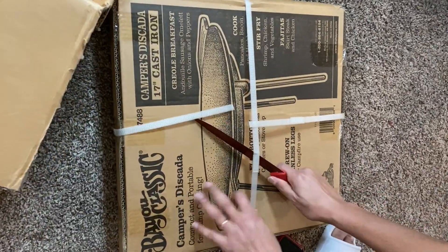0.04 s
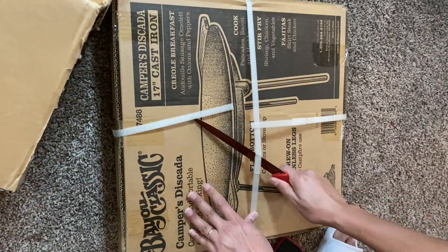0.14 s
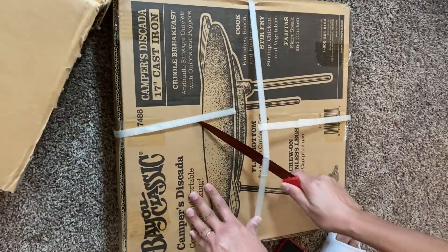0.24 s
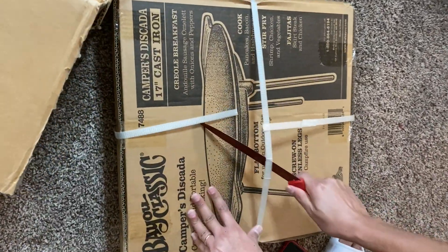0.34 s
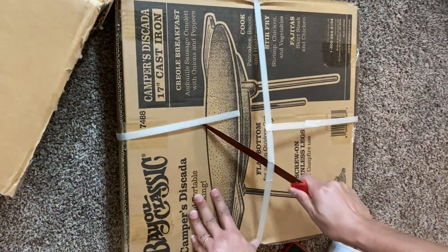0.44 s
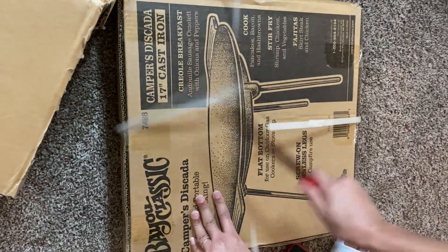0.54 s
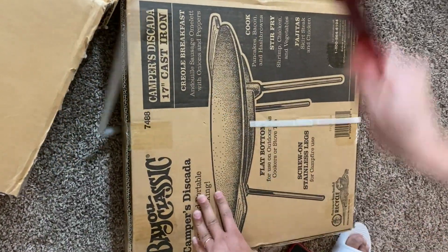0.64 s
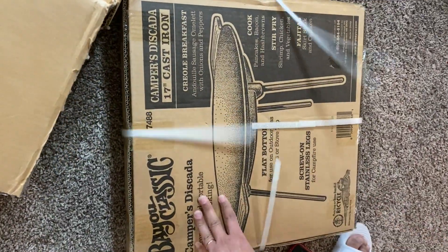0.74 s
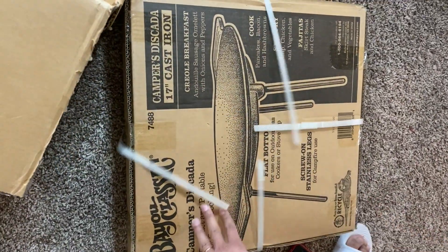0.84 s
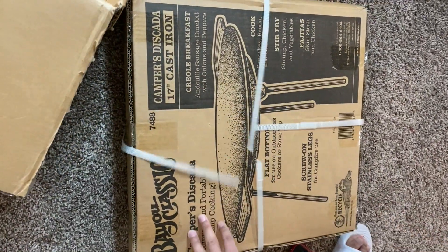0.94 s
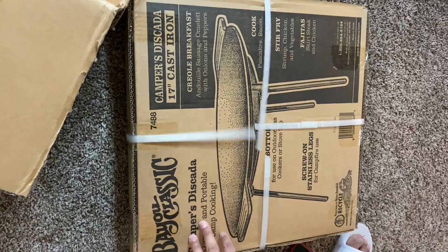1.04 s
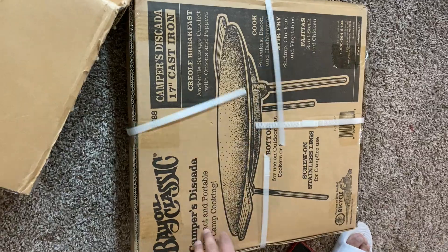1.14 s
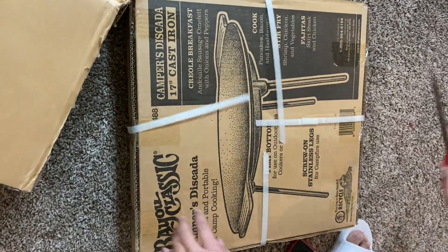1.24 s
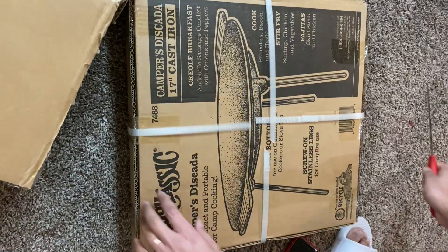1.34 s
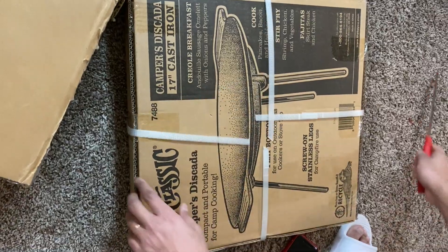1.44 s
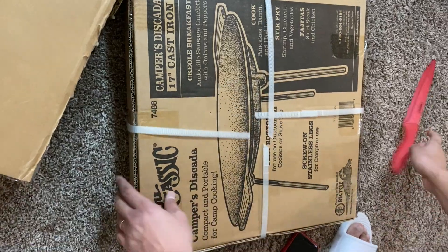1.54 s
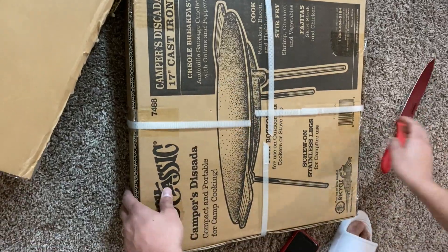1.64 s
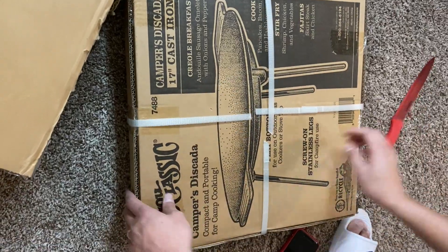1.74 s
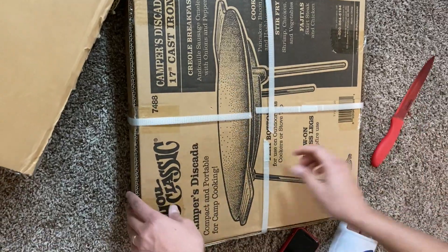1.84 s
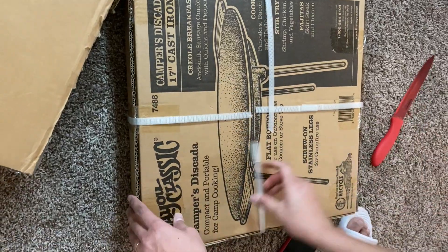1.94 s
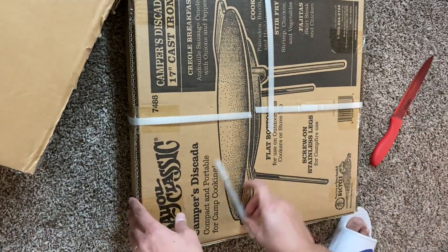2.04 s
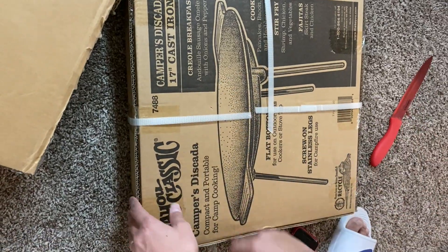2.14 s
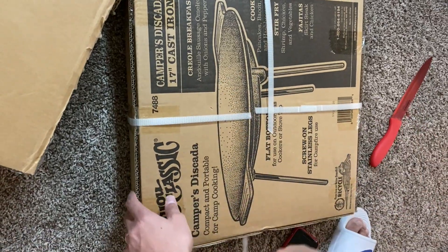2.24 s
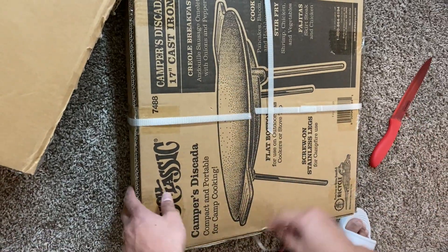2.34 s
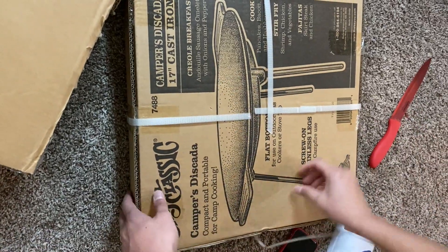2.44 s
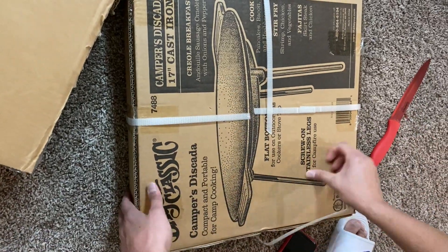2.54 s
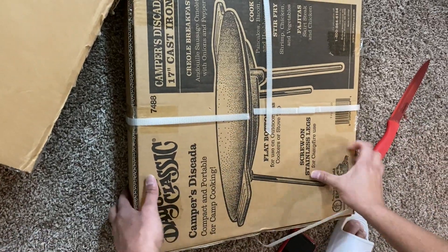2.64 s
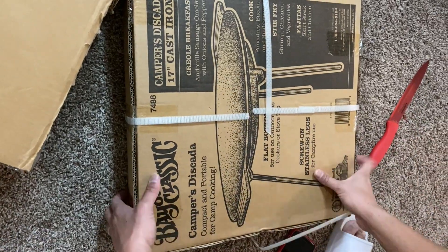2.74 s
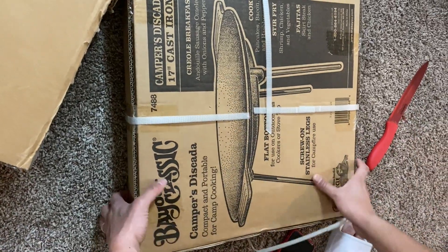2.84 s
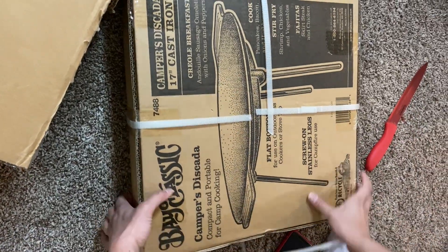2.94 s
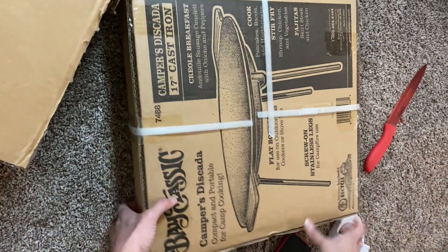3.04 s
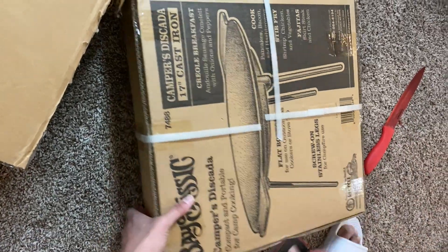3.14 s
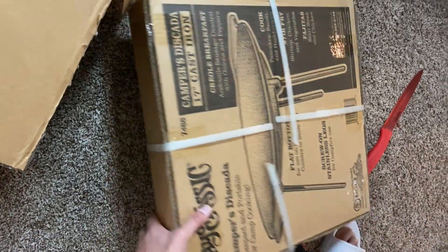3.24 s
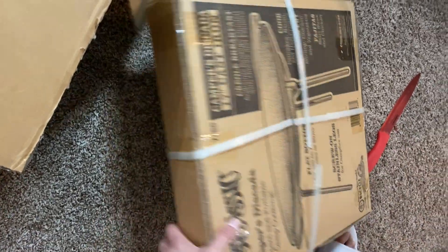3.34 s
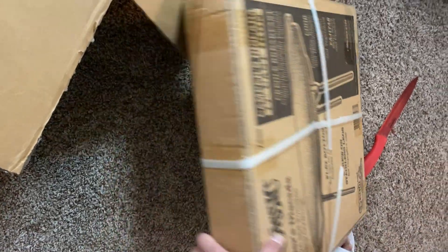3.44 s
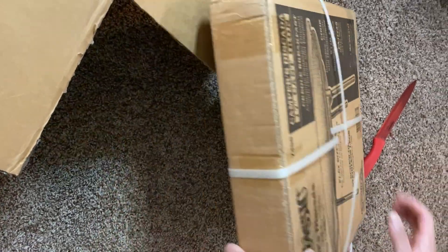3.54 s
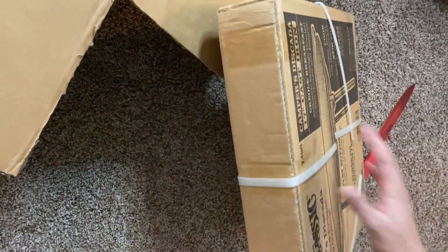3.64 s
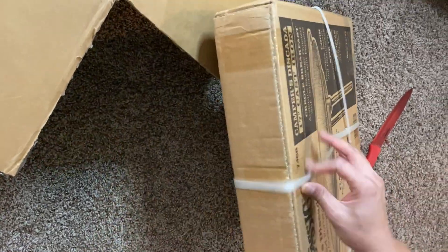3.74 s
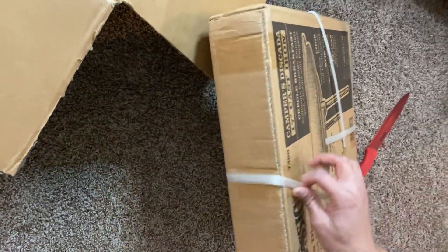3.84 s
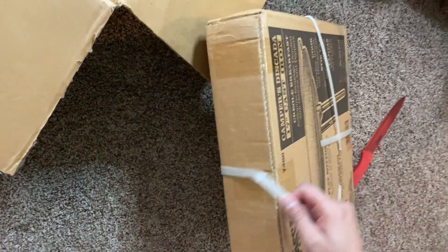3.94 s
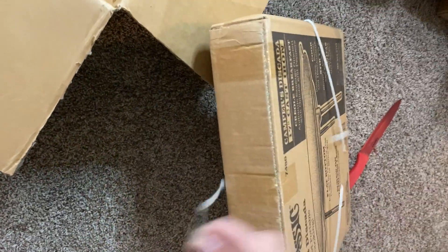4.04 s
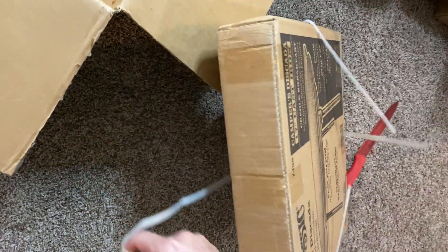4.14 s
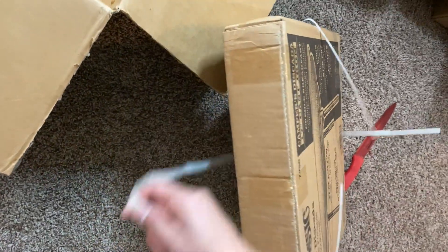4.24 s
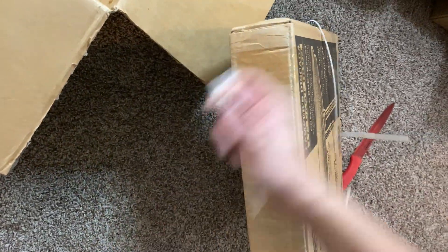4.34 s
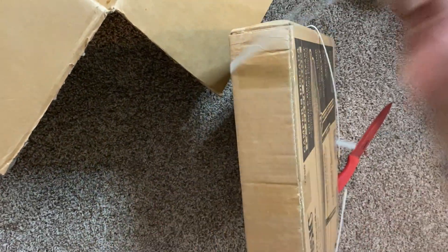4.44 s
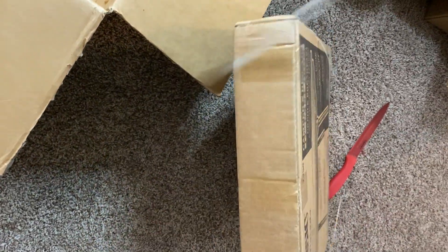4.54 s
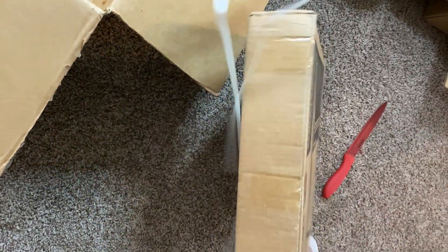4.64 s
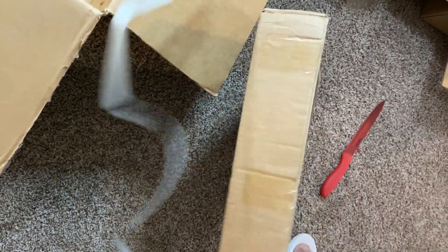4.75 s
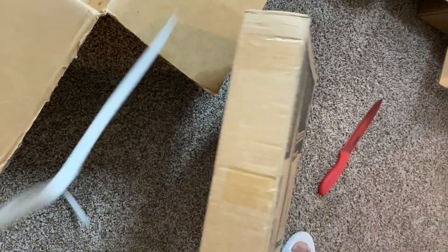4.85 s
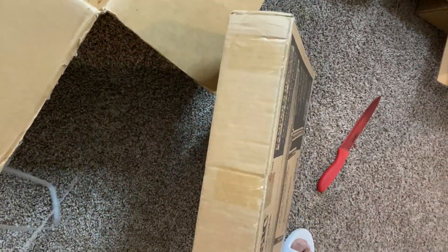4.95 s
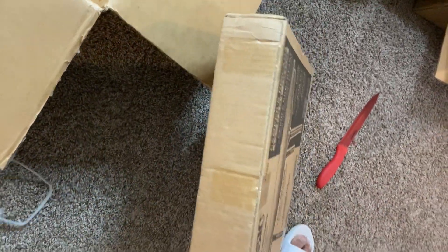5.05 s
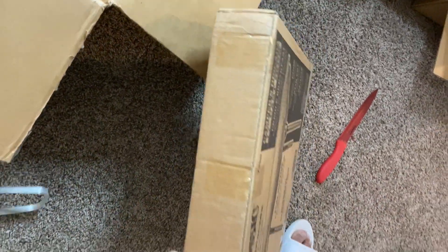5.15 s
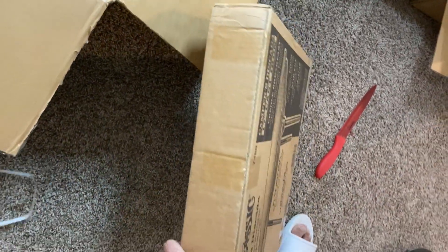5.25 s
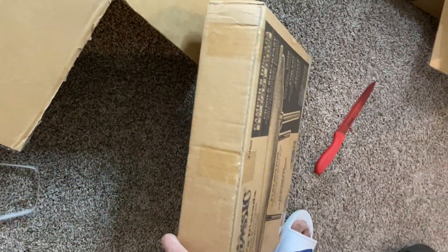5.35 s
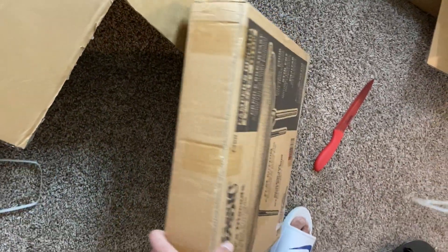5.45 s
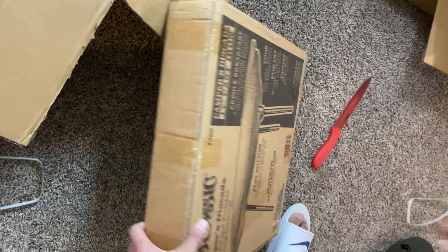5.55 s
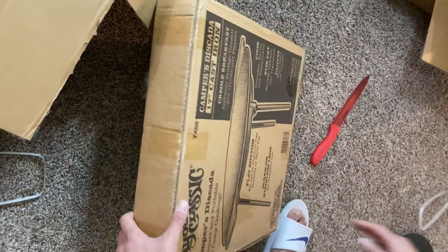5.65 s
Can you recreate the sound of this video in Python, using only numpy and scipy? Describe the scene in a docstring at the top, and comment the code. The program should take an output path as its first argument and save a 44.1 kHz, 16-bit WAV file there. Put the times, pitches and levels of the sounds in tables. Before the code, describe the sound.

A close stereo microphone in a small, short-sounding carpeted room, over faint low rumble. From 0 to 0.5 s, hands pat and shift a flat cardboard box with dull knocks and small strap ticks. At 0.52 s a knife parts a tight plastic strap: by far the loudest event, a sharp falling crack with a hollow box thump and bright tail. Clicks and knocks follow near 0.7 and 0.8 s. From 0.9 to 1.9 s it is nearly quiet, with faint squeaks and touches. Light pats and ticks come at 1.9, 2.1 and 2.45 s; from 2.65 to 3.4 s crackly ticks and cardboard scraping grow denser. Hollow thuds at 3.5 and 3.7 s mark the box tipping upright. From 4.3 to 4.75 s the strap rasps loose and whips an empty carton, with a hard snap at 4.65 s and a tiny metal clink. Soft bumps and ticks end it by 5.7 s.

```python
"""Hands pat and shift a flat cardboard box on a carpet, then a knife snaps a plastic strap with a loud crack.
Straps and card drag and tick, pats ring the hollow box as it is dragged and tipped up, and at last the straps
whip an empty carton, a metal part clinks and a few blows follow; a low rumble and a small room lie under it all.
Blows, carton, taps and clink are damped sines, a snap is a falling sine, ticks are noise bursts,
and drags, slides, rumble and room are shaped noise."""
import sys
import numpy as np
from scipy import signal
from scipy.fft import rfft, irfft, next_fast_len
from scipy.io import wavfile
from scipy.ndimage import uniform_filter1d, map_coordinates

SR = 44100
rng = np.random.default_rng(int(sys.argv[2]) if len(sys.argv) > 2 else 0)


def generate_wav(sig):
    """Save sig (samples, or channels by samples) to the path in sys.argv[1] as 16-bit PCM at SR."""
    pcm = np.round(np.clip(np.atleast_2d(sig).T, -1, 1) * 32767).astype(np.int16)
    wavfile.write(sys.argv[1], SR, pcm)


N = 251800

# Blows on the box. Each row: start in seconds, level in dB, slap and thud in dB relative to it,
# pitch of the struck panel in Hz.
BLOWS = [(0.078, -27.5, -18, -22, 177.4), (0.102, -34, -30, -24, 175), (0.205, -22, -8.5, -30, 275),
         (0.214, -29, -28, -25, 147), (0.38, -30.5, -28, -25, 330), (0.479, -24, -13, -12, 223),
         (0.52, -8.5, -2, -28, 630), (0.538, -10, -21, -20, 197), (0.554, -13.5, -16, -12, 218),
         (0.694, -19.5, -11, -24, 244.3), (0.798, -24.5, 0, -30, 257), (0.869, -42.5, 8, -15, 131),
         (1.19, -47.5, 1, -20, 695), (1.037, -43, 9, 1, 452), (1.105, -39.5, -1, -3, 480),
         (1.384, -30, -20, -12, 259), (1.393, -36, -18, -18, 363), (1.397, -27, -28, -10, 115),
         (1.583, -42, -13, -20, 508), (1.591, -38.5, -19, 9.5, 275), (1.908, -20.5, -11, -32.5, 219),
         (2.055, -29.5, -9.5, -3, 202), (2.097, -24, -19, -31, 209), (2.434, -24.5, -15, -14, 356),
         (2.448, -20, -13, -24, 326), (2.638, -25, -18, -27, 399), (2.654, -25, -20, -26, 283),
         (2.689, -28, -28, -18, 280), (2.72, -27.5, -30, -20, 171), (2.739, -30.5, -14, -16, 284),
         (2.814, -20, -9.5, -24, 330), (2.827, -25.5, -7, -26, 293), (2.841, -36, -30, -20, 130),
         (2.989, -33, -6, -15, 542), (3.023, -24.5, -24, -19, 296), (3.03, -32, -30, -19, 129),
         (3.054, -18, -22, -25, 280), (3.066, -30, -32, -20, 143), (3.217, -25, -30, -20, 197),
         (3.226, -20, -21, -3.5, 272), (3.498, -16.5, -14, 2.5, 172.5), (3.57, -32, -30, -20, 161),
         (3.677, -27, -17, 8, 175), (3.696, -22, -14.5, -4, 298), (3.706, -27.5, -30, -10, 130),
         (3.775, -31.5, -7, 0, 136), (3.819, -33, -26, -2, 169), (3.975, -32.5, -3, -18, 403),
         (4.057, -31.5, -10, -13, 512), (4.099, -30.5, -16, -10, 238), (4.394, -19.5, -14, -15, 631),
         (4.454, -27.5, 4.5, -3, 686), (4.464, -24, -9, -27.5, 270), (4.468, -20.5, -30, -25, 136),
         (4.535, -25, 6.5, -27, 228), (4.551, -27, -3, -25, 167), (4.615, -30, 1, -14, 687),
         (4.659, -20.5, 7, -33, 515), (4.713, -21, -26, -2, 126), (5.09, -35.5, -12, 1, 220),
         (5.175, -44, 4, -12, 635), (5.205, -35, -14, -19, 180), (5.322, -33.5, -31, 4, 160),
         (5.541, -27.5, -31, -21, 172), (5.563, -29, -16, 5.5, 240)]
# Ringing modes of the box. Each row: frequency in Hz, relative level in dB, t60 in seconds.
BOX_MODES = [(68.9, -38, 0.25), (126, -18, 0.35), (155.4, 1.5, 0.34), (198.1, -3, 0.42),
             (224, -11.5, 0.064), (262, -3, 0.44), (355, -3.5, 0.2), (445, -3, 0.11), (507.3, 0.5, 0.19),
             (556, -12, 0.29), (756, -20.5, 0.14)]
# Colour of the slap. Each row: frequency in Hz, relative level in dB.
SLAP_COLOUR = [(300, -14), (600, 10), (900, 2), (1500, -5), (2600, -10.5), (3400, -23.5), (5000, -44),
               (9000, -70.5)]
HOLLOW_DB, NEAR_DB_PER_OCTAVE = -17.5, 12  # hollow ring under the blow; loss away from the panel's pitch
PANEL_CYCLES_PER_60_DB, PANEL_RISE_S = 12.9, 0.0011
PANEL_SAG, PANEL_SAG_S = 0.26, 0.0017  # the panel starts this share sharp and settles
BENDING_S_ROOT_HZ, ADVANCE_S = 0.0678, 0.001502  # delay is the first over sqrt(Hz), less the second


def knocks():
    """Each blow favours modes near the struck panel's pitch; bending waves bring the treble first."""
    body, slap, t = np.zeros(N + SR), np.zeros(N + SR), np.arange(SR // 2) / SR
    hz, level_db, t60_s = np.transpose(BOX_MODES)[:, :, None]
    for start_s, db, slap_db, thud_db, pitch_hz in BLOWS:
        hit = slice(round(start_s * SR), round(start_s * SR) + len(t))
        near_db = -NEAR_DB_PER_OCTAVE * np.abs(np.log2(hz / pitch_hz)) + rng.normal(0, 5.16, hz.shape)
        modes = amp(level_db + near_db + HOLLOW_DB - 60 * t / t60_s) * np.sin(2 * np.pi * hz * t)
        turns = pitch_hz * (t + PANEL_SAG * PANEL_SAG_S * (1 - np.exp(-t / PANEL_SAG_S)))
        panel = amp(-60 * t * pitch_hz / PANEL_CYCLES_PER_60_DB) * np.sin(2 * np.pi * turns)
        panel *= 1 - np.exp(-t / PANEL_RISE_S)
        thud = amp(thud_db - 4.5 - 60 * t / 0.28) * np.sin(2 * np.pi * BOX_MODES[0][0] * t)
        thud *= 1 - np.exp(-t / 0.028)
        body[hit] += amp(db - 0.5) * (panel + modes.sum(0) + thud)
        scatter = rng.standard_normal(len(t)) * amp(1.0 - 60 * t / 0.058)
        scatter[0] = 1.5
        slap[hit] += amp(db + slap_db - 5.5) * scatter

    def bending(f):
        return np.exp(-4j * np.pi * BENDING_S_ROOT_HZ * np.sqrt(f) + 2j * np.pi * f * ADVANCE_S)
    return filtered(body[:N] + filtered(slap[:N], causal(SLAP_COLOUR)), bending)


# A strap lets go or lashes a flat panel. Each row: start in seconds, level in dB, first and last pitch
# in Hz, time constant of the glide, time until damping, time constant of the rise, all in seconds.
SNAPS = [(0.5195, -4, 1633, 143, .002, 0.0098, 0.00073), (1.903, -30.5, 1470, 220, .003, 0.012, 0.0029),
         (2.651, -26.5, 1246, 294, 0.0028, 0.0079, 0.0019), (4.453, -29, 1804, 263, 0.0037, 0.0095, 0.0024),
         (4.535, -26, 1760, 490, 0.0029, 0.0036, 0.0017),
         (4.65295, -8.5, 2620, 330, 0.0013, 0.0035, 0.00037)]


def snap():
    """One bending wave through the panel: the pitch falls fast, then the swing is damped."""
    out = np.zeros(N)
    for start_s, db, first_hz, last_hz, glide_s, swing_s, rise_s in SNAPS:
        t = np.clip(np.arange(N) / SR - start_s, 0, 1)
        turns = last_hz * t + (first_hz - last_hz) * glide_s * (1 - np.exp(-t / glide_s))
        swing = (1 - np.exp(-t / rise_s)) * amp(-60 * np.clip(t - swing_s, 0, 1) / 0.016)
        out += amp(db) * swing * np.sin(2 * np.pi * turns)
    return out


# Ticks of strap and blade. Each row: start in seconds, level in dB, lower edge sound in dB relative to it.
STRAP_TICKS = [(0.086, -38, -19), (0.138, -39.5, -14), (0.207, -33.5, 6.5), (0.2513, -38, -13),
               (0.2632, -38, -18), (0.275, -40, -10), (0.307, -34.5, -4), (0.403, -42, -20),
               (0.444, -38.5, -4), (0.4635, -38, -9), (0.4834, -21.5, -16), (0.519, -5, 2),
               (0.5266, -5.5, -12), (0.6863, -13.5, -23), (0.776, -29, -15), (0.797, -15, -27),
               (0.972, -31.5, -17), (0.9849, -35, -10), (1.0384, -51, 3), (1.071, -48, -20.5),
               (1.112, -43, 3.5), (1.257, -51, -25), (1.3097, -52, 13), (1.328, -43, -25),
               (1.3898, -28, -6), (1.4628, -36.5, -3.5), (1.5944, -40, -13.5), (1.9043, -33, -19),
               (2.051, -31.5, -12), (2.119, -35, -16), (2.254, -35, -11.5), (2.434, -41.5, -7),
               (2.447, -52, -17), (2.652, -33.5, -8), (2.743, -25.5, -17), (2.7685, -35, -7),
               (2.778, -29, -8), (2.812, -21.5, -4.5), (2.819, -24, -12), (2.8457, -26, -5),
               (2.8579, -23, -11), (2.9442, -36, -11), (3.016, -38, -20), (3.027, -32, -17),
               (3.044, -27, -20), (3.0577, -20.5, -15), (3.0654, -21, -17), (3.075, -25, -2),
               (3.1157, -25.5, -24.5), (3.1242, -25.5, -16), (3.1507, -34, -1), (3.159, -26.5, -14),
               (3.196, -45, -10), (3.288, -43, -4), (3.314, -31, -5), (3.495, -36.5, 7.5), (3.6, -43, -17),
               (3.694, -27.5, -4.5), (3.7364, -21.5, -4.5), (3.7503, -26, -0.5), (3.775, -32.5, 0),
               (3.855, -30, -6), (3.905, -42, -3), (3.9757, -28, 4.5), (4.0534, -41.5, 7.5),
               (4.3332, -22, -13), (4.392, -35, 7), (4.41, -19.5, -4.5), (4.428, -23, -11),
               (4.4536, -15.5, -16), (4.5375, -16.5, 0), (4.5534, -12.5, -5), (4.596, -19.5, -2),
               (4.6164, -28, 2), (4.6264, -30, -14), (4.7476, -29.5, 2), (4.9904, -33.5, -10),
               (5.1018, -42.5, -4), (5.1286, -43.5, -2), (5.1765, -26, -2.5), (5.197, -31, -4),
               (5.47, -39.5, -17), (5.5713, -38, -19)]
# Colour of strap tick and drag. Each row: frequency in Hz, relative level in dB.
STRAP_COLOUR = [(1470, -38.5), (2500, -11.5), (4680, -11), (5440, -1.5), (6460, -5), (7050, -5),
                (9650, -6.5), (11100, -5.5), (13900, -12.5), (16300, -40)]
# Colour of the lower edge sound. Each row: frequency in Hz, relative level in dB.
EDGE_COLOUR = [(400, -46), (1000, 8.5), (3000, 6), (4500, -26.5), (9000, -57)]
TICK_T60_S, TICK_TILT_DB = 0.013, 4  # tilt: some ticks are brighter, some duller, up to this


def ticks():
    """Short bursts as the stiff strap slips off an edge, each with its own brightness."""
    parts, t = np.zeros((3, N + SR)), np.arange(SR // 8) / SR
    for start_s, db, edge_db in STRAP_TICKS:
        tilt_db = TICK_TILT_DB * rng.uniform(-1, 1)
        envelope = amp(db - 60 * t / TICK_T60_S) * (1 - np.exp(-t / 0.00067))
        burst = envelope * rng.standard_normal((3, len(t)))
        gains = amp([[-3.0 - tilt_db], [-5.5 + tilt_db], [edge_db - 1.0]])
        parts[:, round(start_s * SR):][:, :len(t)] += gains * burst
    bright = [(hz, db + 3.5 * np.log2(hz / 6000)) for hz, db in STRAP_COLOUR]
    colours = [STRAP_COLOUR, bright, EDGE_COLOUR]
    return sum(filtered(part[:N], causal(colour)) for part, colour in zip(parts, colours))


# Pitched taps of strap ends and card edges. Each row: start in seconds, level in dB, pitch in Hz,
# t60 in seconds.
EDGE_TAPS = [(.598, -31, 1355, .04), (.687, -16, 1103, .02), (0.6864, -14, 5450, 0.019),
             (.776, -23, 5300, .015), (1.012, -48, 1750, 0.032), (1.311, -46, 4200, 0.018),
             (2.07, -37, 2280, 0.032), (2.078, -36, 5660, 0.027), (2.083, -29, 5460, 0.031),
             (2.122, -40, 5200, 0.031), (2.638, -41, 1480, .03), (2.75, -45, 1780, 0.025),
             (2.777, -36, 1450, 0.038), (2.814, -33.5, 2635, 0.062), (3.027, -31.5, 3800, 0.024),
             (3.16, -35, 2700, 0.039), (3.288, -33.5, 3200, 0.023), (4.395, -29, 640, 0.044),
             (4.537, -35, 963, 0.04), (4.556, -19.5, 783, 0.061), (4.578, -32, 5810, 0.013),
             (4.6165, -27, 900, .025), (4.752, -22.5, 560, 0.033), (5.177, -29, 798, 0.032),
             (5.178, -33, 1560, 0.077), (5.469, -33, 3620, 0.017)]
TAP_BLUR_HZ = 150


def taps():
    """Each tap rings briefly on one slightly unsteady pitch."""
    out, t = np.zeros(N + SR), np.arange(SR // 8) / SR
    for start_s, db, hz, t60_s in EDGE_TAPS:
        drift = np.cumsum(rng.normal(0, np.sqrt(2 * np.pi * TAP_BLUR_HZ / SR), len(t)))
        envelope = amp(db - 60 * t / t60_s) * (1 - np.exp(-t / 0.00086))
        out[round(start_s * SR):][:len(t)] += envelope * np.sin(2 * np.pi * hz * t + drift)
    return out[:N]


# The loose strap whips an empty carton. Each row: start in seconds, level of the ring in dB,
# seconds until the next touch damps it.
CARTON_WHIPS = [(4.457, -23, 0.026), (4.539, -23, 0.12), (4.553, -28.5, 0.054), (4.654, -18, 0.081),
                (4.765, -31.5, .4)]
# Ringing modes of the carton. Each row: frequency in Hz, relative level in dB, t60 in seconds.
CARTON_MODES = [(140, -18, 0.27), (158.8, 0.5, 0.24), (265.6, 1.5, 0.34), (369, -26, 0.37), (510, -5, 0.13),
                (555, -19, 0.27), (720, -21, 0.31), (1060, -24, 0.12)]


def carton():
    """The empty carton rings on its own modes, slow to swell, until a touch damps it."""
    out, t = np.zeros(N + SR), np.arange(SR // 2) / SR
    hz, level_db, t60_s = np.transpose(CARTON_MODES)[:, :, None]
    for start_s, db, free_s in CARTON_WHIPS:
        uneven_db = rng.normal(0, 1.6, hz.shape)
        modes = amp(level_db + uneven_db - 60 * t / t60_s) * np.sin(2 * np.pi * hz * t)
        envelope = amp(db - 60 * np.clip(t - free_s, 0, 1) / .06) * (1 - np.exp(-t / 0.0094))
        out[round(start_s * SR):][:len(t)] += envelope * modes.sum(0)
    return out[:N]


# Quick drags of a strap over an edge. Each row: start and end in seconds, then levels in dB
# of strap rasp, cardboard scuff and narrow sizzle.
EDGE_DRAGS = [(0.194, 0.214, -59, -55, -71), (0.235, 0.323, -64, -64, -61.5),
              (0.502, 0.602, -41.5, -37, -43.5), (0.725, 0.816, -45.5, -44.5, -49.5),
              (1.056, 1.132, -65, -55.5, -57), (1.902, 1.93, -55, -56, -49),
              (2.049, 2.125, -50, -44.5, -46), (2.436, 2.57, -65, -73, -62),
              (2.735, 2.785, -49.5, -43.5, -64), (2.804, 2.864, -47, -42.5, -61),
              (3.022, 3.089, -52, -41.5, -63), (3.116, 3.191, -50.5, -53, -65),
              (3.193, 3.226, -43.5, -46, -61), (3.708, 3.772, -48, -47, -58), (3.972, 4.027, -49, -51, -61),
              (4.044, 4.079, -53, -44.5, -50.5), (4.331, 4.339, -45, -40, -38),
              (4.407, 4.416, -39, -34, -59), (4.449, 4.463, -29, -26, -54), (4.533, 4.565, -32, -28, -48),
              (4.595, 4.66, -42, -55, -54), (5.175, 5.212, -42.5, -49.5, -70),
              (5.592, 5.66, -66.5, -52.5, -64)]
# Cardboard scuff. Each row: frequency in Hz, relative density in dB per Hz.
SCUFF_COLOUR = [(350, -1), (600, 4.5), (841, -3.5), (1180, -6.5), (1580, -7.5), (2000, -7), (3320, -7),
                (4500, -10.5), (5850, -49.5), (9900, -120)]
# Skin or strap on smooth card. Each row: frequency in Hz, relative density in dB per Hz.
SIZZLE_COLOUR = [(3500, -61.5), (4800, -21.5), (5300, 0.5), (6400, 0.5), (7400, -5.5), (8500, -17),
                 (11000, -43)]


def drags():
    """The strap's ribs catch and let go in dense crackle: sudden start, fading end."""
    t, levels = np.arange(N) / SR, np.zeros((3, N))
    for start_s, end_s, *dbs in EDGE_DRAGS:
        stroke = np.clip((t - start_s) / 0.005, 0, 1) * amp(-60 * np.clip(t - end_s, 0, 1) / 0.069)
        levels += amp(dbs)[:, None] * stroke
    rasp, scuff, sizzle = levels * unit(amp(3.5 * wobble(130)))
    return (rasp * rush(STRAP_COLOUR, grit_db=1.5, grit_rate=410)
            + scuff * rush(SCUFF_COLOUR, grit_db=1.0, grit_rate=520)
            + sizzle * rush(SIZZLE_COLOUR, grit_db=2.0, grit_rate=300))


# A small metal part is flicked. One row: start in seconds, level in dB.
METAL_FLICK = (4.747, -39)
# Its partials. Each row: frequency in Hz, relative level in dB, t60 in seconds.
METAL_MODES = [(2143, 0, .05), (4097, -17, .6), (6500, 2, .08), (6880, 0, .09), (9561, 1, .12)]


def clink():
    """The metal part gives a thin ring with a rattling phase."""
    start_s, db = METAL_FLICK
    t = np.clip(np.arange(N) / SR - start_s, 0, 1)
    ring = np.zeros(N)
    for hz, level_db, t60_s in METAL_MODES:
        envelope = amp(level_db + 3 * wobble(60) - 60 * t / t60_s)
        ring += envelope * np.sin(2 * np.pi * hz * t + .8 * wobble(200))
    return amp(db) * ring * (1 - np.exp(-t / 0.00059))


# Faint squeaks of sliding card. Each row: start and end in seconds, centre in Hz, level in dB.
CARD_SQUEAKS = [(1.1, 1.24, 1680, -71), (0.88, 1.2, 3290, -71), (3.3, 3.7, 2020, -65.5),
                (4.2, 4.3, 4130, -72)]
SQUEAK_WIDTH_HZ = 80


def squeaks():
    """Narrow bands of noise that swell and fade."""
    t, out = np.arange(N) / SR, np.zeros(N)
    for start_s, end_s, hz, db in CARD_SQUEAKS:
        swell = np.sqrt(np.abs(np.sin(np.pi * np.clip((t - start_s) / (end_s - start_s), 0, 1))))
        band = filtered(rng.standard_normal(N), lambda f: 1 / (1 + (2 * (f - hz) / SQUEAK_WIDTH_HZ) ** 2))
        out += amp(db + 3.7 * wobble(25)) * swell * unit(band)
    return out


# Longer slides of box, hands and straps. Each row: start and end in seconds, then levels in dB
# of strap and carpet rasp, cardboard scuff and narrow sizzle.
LONG_SLIDES = [(0, 0.015, -70, -66, -70), (0.423, 0.506, -71, -72, -72), (.55, 0.662, -53, -64, -50),
               (0.724, 0.86, -57, -60, -53), (1.24, 1.29, -68, -75, -64.5), (1.91, 2.004, -55, -60, -58),
               (2.443, 2.604, -49.5, -51.5, -55), (2.638, 2.8, -56.5, -54, -71),
               (2.87, 2.934, -57, -51, -64), (2.944, 3.02, -55, -50.5, -67), (3.07, 3.22, -57, -48.5, -66),
               (3.226, 3.343, -47, -50, -64), (3.35, 3.392, -45, -47.5, -65), (3.439, 3.47, -69, -49, -66),
               (3.72, 3.87, -70, -58, -61.5), (3.976, 4.11, -58, -75, -73), (4.2, 4.254, -69, -57, -76),
               (4.327, 4.444, -46, -43, -59), (4.453, 4.495, -44.5, -39.5, -60),
               (4.508, 4.525, -38, -38, -52), (4.552, 4.58, -49, -41, -56), (4.604, 4.742, -56, -46, -60),
               (5.486, 5.636, -62, -59, -66)]
# Hands resting and shifting on the box. Each row: time in seconds, then levels in dB
# of faint rasp, faint scuff and low rumble.
HANDS = [(0, -49.5, -51.5, -50), (.15, -66.5, -62.5, -44), (.35, -66, -67, -54.5), (0.521, -54, -51, -39),
         (.68, -59, -43, -36), (.95, -59, -57, -53), (1.15, -70.5, -60.5, -55.5), (1.35, -65.5, -62.5, -48),
         (1.7, -63.5, -65.5, -42.5), (1.879, -64.5, -69.5, -55), (2.349, -64, -64, -52),
         (2.85, -61, -55, -48.5), (3.3, -56, -73, -46), (3.55, -66, -63.5, -53), (3.9, -69, -61, -45.5),
         (4.3, -66, -56.5, -45.5), (4.6, -43.5, -46.5, -63), (4.9, -61.5, -62.5, -55),
         (5.1, -69, -60, -53.5), (5.45, -63.5, -62, -51), (5.71, -64, -59, -62.5)]
# Strap and carpet rasp. Each row: frequency in Hz, relative density in dB per Hz.
RASP_COLOUR = [(1760, -30), (3000, -27.5), (3750, -19.5), (4660, -11.5), (5370, -5), (7500, -8.5),
               (8600, -8), (10700, -8), (11400, -11), (12500, -10.5), (15100, -14.5), (16000, -37)]
# Walls of the box and the floor. Each row: frequency in Hz, relative density in dB per Hz.
DRUM_COLOUR = [(53, -50), (90, -19.5), (124, 7.5), (146, -4.5), (214, 0), (265, -5), (297, -4),
               (515, -11.5), (900, -23), (1170, -27.5), (1980, -120)]
# Low rumble. Each row: frequency in Hz, relative density in dB per Hz.
RUMBLE_COLOUR = [(12, -56.5), (20, -37.5), (27, -25), (40, -22.5), (54, 0.5), (71, 4), (130, -1.5),
                 (170, -54.5), (290, -120)]
SLIDE_ATTACK_S, SLIDE_T60_S = 0.015, 0.38
RASP_GRIT_HZ, RASP_GRIT_DB, SCUFF_GRIT_HZ, SCUFF_GRIT_DB = 6940, -10, 1620, -10.5
DRUM_OVER_SCUFF_DB = 6.5
DRUM_AFTER_DB, DRUM_RISE_S, DRUM_T60_S = -15, 0.014, 0.36  # the walls shake on after a blow
RUMBLE_AFTER_DB, RUMBLE_RISE_S, RUMBLE_T60_S = -19.5, 0.066, .8  # the floor shakes on after a thud


def rubbing():
    """Straps and cardboard drag over carpet and box; walls and floor shake along and after each blow."""
    time_s, *columns = np.transpose(HANDS)
    fine_db, rest_db, low_db = [np.interp(np.arange(N) / SR, time_s, column) for column in columns]
    # all strengths are powers until the square roots below
    drum, rumble = amp(rest_db + DRUM_OVER_SCUFF_DB) ** 2, amp(low_db) ** 2
    slide_rasp, slide_scuff, sizzle = np.zeros((3, N))
    for start_s, end_s, rasp_db, scuff_db, sizzle_db in LONG_SLIDES:
        stroke = fading(start_s, end_s, SLIDE_ATTACK_S, SLIDE_T60_S)
        slide_rasp += amp(rasp_db) ** 2 * stroke
        slide_scuff += amp(scuff_db) ** 2 * stroke
        sizzle += amp(sizzle_db) ** 2 * stroke
    for at_s, db, _, thud_db, _ in BLOWS:
        drum += amp(db + DRUM_AFTER_DB) ** 2 * fading(at_s, at_s, DRUM_RISE_S, DRUM_T60_S)
        shake = fading(at_s, at_s, RUMBLE_RISE_S, RUMBLE_T60_S)
        rumble += amp(db + thud_db + RUMBLE_AFTER_DB) ** 2 * shake
    rasp, scuff = amp(fine_db) ** 2 + slide_rasp, amp(rest_db) ** 2 + slide_scuff
    uneven = amp(1.5 * wobble(25) + 1.1 * wobble(7.3))
    catches = np.sqrt(slide_rasp) * amp(RASP_GRIT_DB) * grit(RASP_GRIT_HZ, spread=.22)
    catches += np.sqrt(slide_scuff) * amp(SCUFF_GRIT_DB) * grit(SCUFF_GRIT_HZ, spread=.7)
    return (ports(uneven * catches)
            + np.sqrt(rasp) * uneven * rush(RASP_COLOUR, grit_db=1.0, grit_rate=70)
            + np.sqrt(sizzle) * uneven * rush(SIZZLE_COLOUR, grit_db=4.0, grit_rate=110)
            + np.sqrt(scuff) * uneven * rush(SCUFF_COLOUR, grit_db=1.0, grit_rate=63)
            + np.sqrt(drum) * rush(DRUM_COLOUR, grit_db=2.5, grit_rate=30)
            + np.sqrt(rumble) * rush(RUMBLE_COLOUR, grit_db=4.5, grit_rate=8))


def fading(start_s, end_s, attack_s, t60_s):
    """Power of a stroke: quick rise, hold, even fall in dB."""
    t = np.arange(N) / SR
    return (np.clip((t - start_s) / attack_s, 0, 1) * amp(-60 * np.clip(t - end_s, 0, 9) / t60_s)) ** 2


GRIT_PER_S, GRIT_CYCLES_PER_30_DB, GRIT_SPREAD_DB = 450, 9, 3.5


def grit(centre_hz, spread):
    """Fibres catch and spring free: damped grains of a few cycles, most small, a few large; rms 1."""
    at, pitch, size = rng.random((int(GRIT_PER_S * N / SR) + 1, 3, 1)).transpose(1, 0, 2)
    hz = np.clip(centre_hz * np.exp(spread * (2 * pitch - 1)), 200, 11000)
    k = np.arange(512)
    cycles = hz * k / SR
    size_db = -GRIT_SPREAD_DB * np.log(np.maximum(size, 1 / 40))
    grains = amp(size_db - 30 * cycles / GRIT_CYCLES_PER_30_DB) * np.sin(2 * np.pi * cycles)
    grains *= np.clip(cycles, 0, 1)
    return unit(np.bincount(((at * N).astype(int) + k).ravel(), grains.ravel(), N + 512)[:N])


# Left-right likeness of noise and room. Each row: frequency in Hz, correlation from -1 to 1 (clipped).
LIKENESS = [(60, 1), (130, 0.98), (290, 0.97), (640, 0.21), (1410, 0.68), (3100, 0.02), (4600, -0.19),
            (5400, 0.89), (7500, 1), (9500, 0.029), (11800, -1.07), (15000, -1.5)]


def rush(spectrum, grit_db, grit_rate):
    """Stereo noise of rms 1 whose strength flutters in grains, grit_rate knots a second."""
    pair = patchy(rng.standard_normal((2, N))) * amp(grit_db * wobble(grit_rate))

    def colour(hz):
        turn = np.arccos(np.clip(along(LIKENESS, hz), -1, 1)) / 2
        return amp(along(spectrum, hz)) * [np.cos(turn), np.sin(turn)]
    mid, side = filtered(pair, colour)
    return unit(np.array([mid + side, mid - side]))


PATCHY_DB = 2.5  # rms


def patchy(x):
    """Random gain in patches of time and frequency shifts the colour of rubbing."""
    z = signal.stft(x, nperseg=256)[2]
    field = uniform_filter1d(rng.standard_normal(z.shape[1:]), size=5, axis=0)
    field = uniform_filter1d(field, size=8, axis=1)
    return signal.istft(z * amp(PATCHY_DB * unit(field)), nperseg=256)[1][:, :N]


# Decay of the room. Each row: frequency in Hz, t60 in seconds.
ROOM_T60 = [(60, 0.26), (300, 0.35), (1000, 0.49), (3000, 0.37), (6000, 0.3), (12000, 0.4)]


def room(x):
    """Each frequency of the room's answer dies at its own speed; a new tail for every .3 s."""
    out, step = np.zeros((2, N + 2 * SR)), SR * 3 // 10
    for at in range(0, N, step):
        hz, t, z = signal.stft(rng.standard_normal((2, SR // 2)), SR, nperseg=256)
        turn = np.arccos(np.clip(along(LIKENESS, hz), -1, 1))[:, None] / 2
        mid, side = z[0] * np.cos(turn), z[1] * np.sin(turn)
        decay = amp(-60 * t / along(ROOM_T60, hz)[:, None])
        tail = signal.istft(np.array([mid + side, mid - side]) * decay, SR, nperseg=256)[1]
        wet = signal.fftconvolve(x[None, at:at + step], tail / np.linalg.norm(tail[0]), axes=1)
        out[:, at + 300:][:, :wet.shape[1]] += wet  # 300 samples of delay
    return out[:, :N]


# Side over mid of near sounds. Each row: frequency in Hz, ratio in dB.
SIDE_OVER_MID = [(50, -27), (150, -26.5), (400, -7.5), (1500, -21.5), (3000, -1), (6000, -10), (10000, 5),
                 (13000, 13)]
# Lean to the right. Each row: frequency in Hz, share of the sound.
RIGHT_LEAN = [(300, 0), (600, 0.095), (3000, 0.31), (5000, 0.011)]


def ports(x):
    """Two close microphone ports: alike in the bass, opposed in the top treble."""
    def share(hz):
        return 1 / np.sqrt(1 + amp(2 * along(SIDE_OVER_MID, hz)))
    side = filtered(x, lambda hz: 1j * share(hz) * amp(along(SIDE_OVER_MID, hz)) - along(RIGHT_LEAN, hz))
    mid = filtered(x, share)
    return np.array([mid + side, mid - side])


def amp(db):
    """Amplitude of a level in dB."""
    return 10 ** (np.asarray(db) / 20)


def unit(x):
    """x scaled to rms 1."""
    return x / np.sqrt(np.mean(x ** 2) + 1e-20)


def along(points, hz):
    """Interpolate (Hz, value) points on a log axis."""
    f, v = np.transpose(points)
    return np.interp(np.log(hz + 1), np.log(f + 1), v)


def wobble(rate):
    """A smooth random curve, rate knots a second."""
    return map_coordinates(rng.standard_normal(int(N * rate / SR) + 4), [np.arange(N) * rate / SR])


def filtered(x, response):
    """x times a complex response of frequency."""
    m = next_fast_len(N + SR // 2)
    return irfft(rfft(x, m) * response(np.fft.rfftfreq(m, 1 / SR)), m)[..., :N]


def causal(points):
    """Minimum-phase response of (Hz, dB) points, of unit energy."""
    def response(hz):
        cepstrum = irfft(np.log(amp(along(points, hz)) + 1e-6))
        cepstrum[1:len(cepstrum) // 2] *= 2
        cepstrum[len(cepstrum) // 2 + 1:] = 0
        log_response = rfft(cepstrum)
        return unit(np.abs(np.exp(log_response))) * np.exp(1j * log_response.imag)
    return response


def scene():
    """Near sounds through the ports, stereo drags and rubbing, and the room's answer."""
    box, lash, strap, drag = knocks() + carton(), snap(), ticks() + taps(), drags()
    wet = room(amp(-8.5) * box + amp(-7.5) * lash + amp(-8.5) * (strap + drag.mean(0)))
    return ports(box + lash + strap + clink() + squeaks()) + drag + wet + rubbing()


LOW_HZ, TOP_HZ = 38.7, 16400


def record(dry):
    """The microphone drops the deepest bass; soft overload on the loudest blow; band limit."""
    def bass_cut(hz):
        x = hz / LOW_HZ
        return ((1j * x) ** 2 / (1 + 1.3j * x - x ** 2)) ** 2
    thin = filtered(dry, bass_cut)
    soft = thin / (1 + np.abs(thin) ** 6) ** (1 / 6)
    return filtered(soft, lambda hz: hz < TOP_HZ)


dry = scene()
out = record(dry)
generate_wav(out)
```